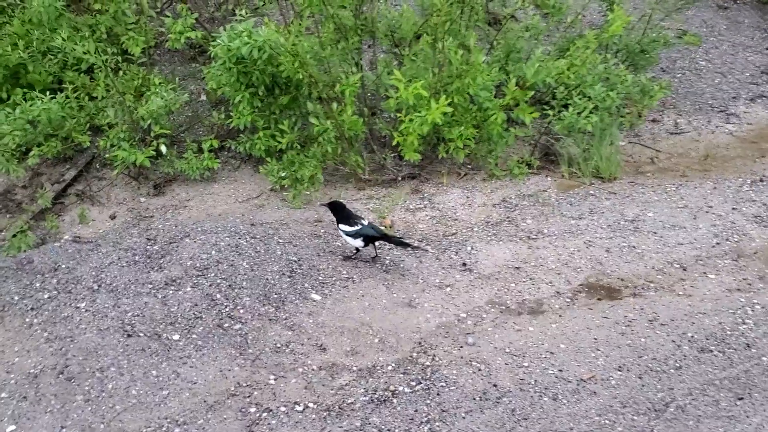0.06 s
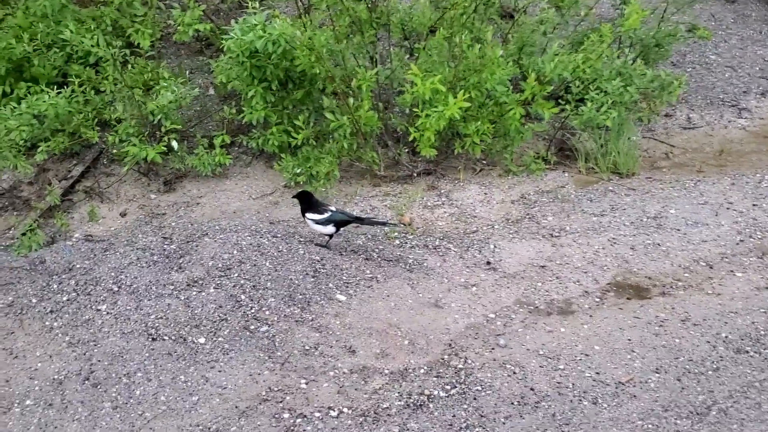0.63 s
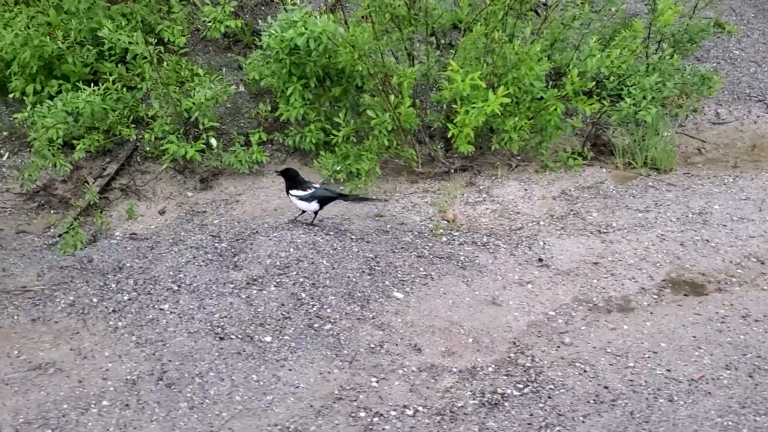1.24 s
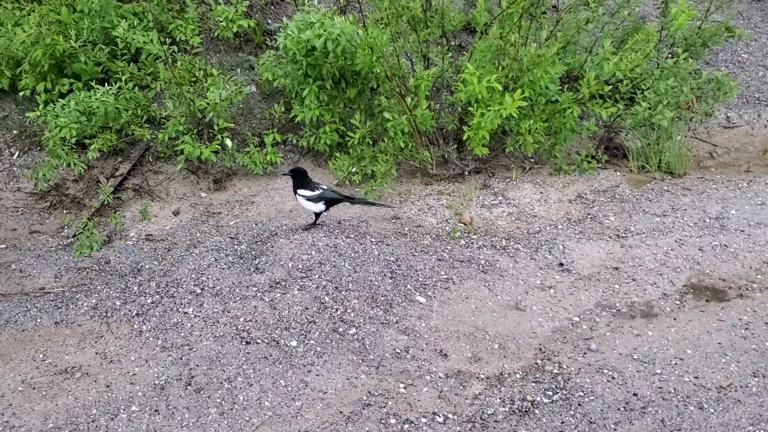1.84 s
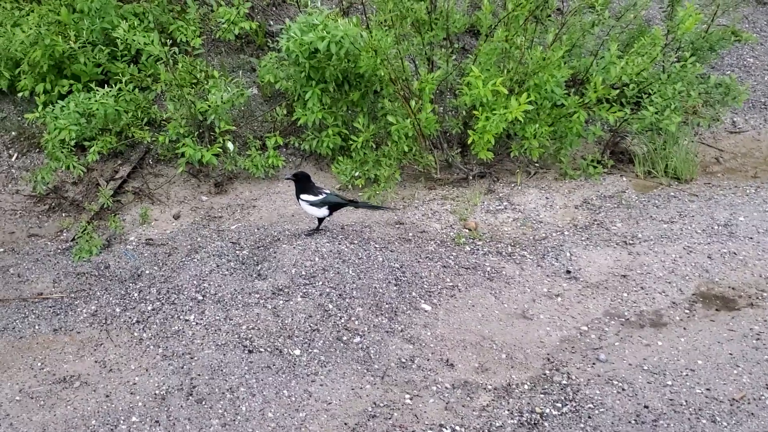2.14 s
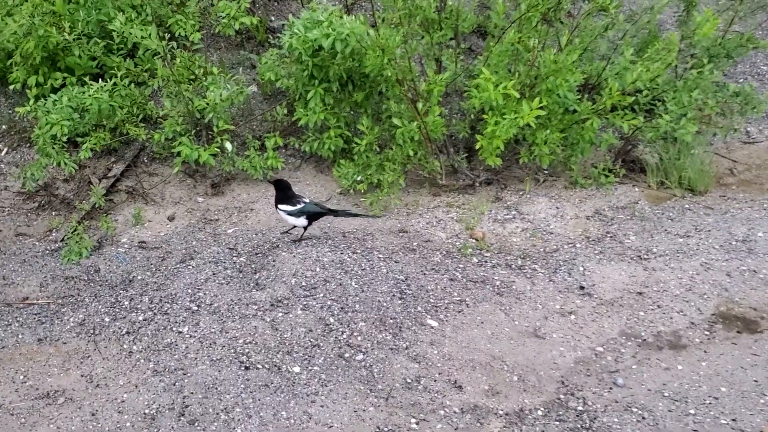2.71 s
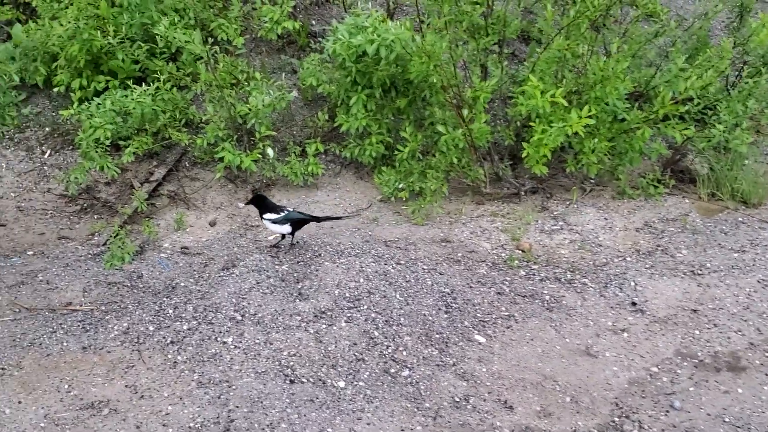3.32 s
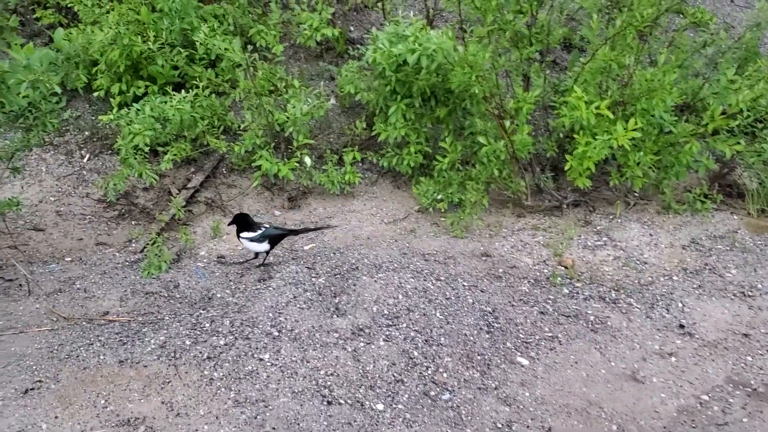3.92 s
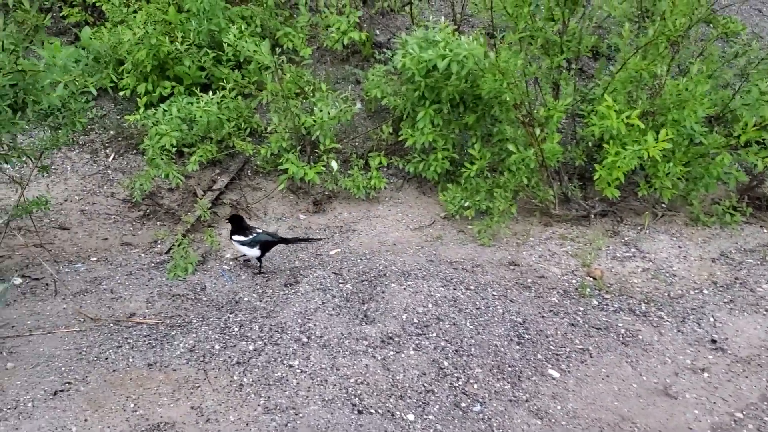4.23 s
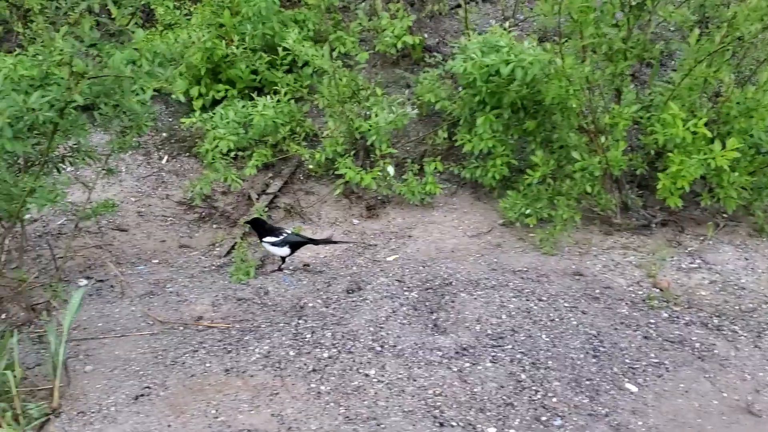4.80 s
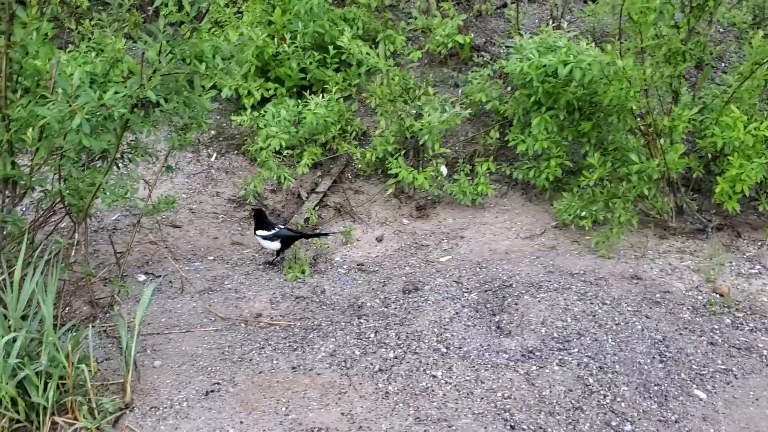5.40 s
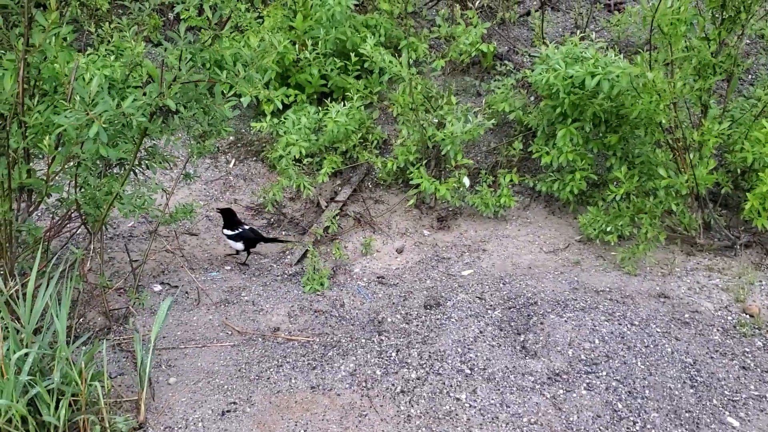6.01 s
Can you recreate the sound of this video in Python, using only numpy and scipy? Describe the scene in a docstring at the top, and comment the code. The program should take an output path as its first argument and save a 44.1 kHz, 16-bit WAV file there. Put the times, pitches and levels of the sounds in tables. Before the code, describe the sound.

A magpie calls outdoors over a faint, steady low rumble, a deep distant drone and soft leafy hiss. After a light scuff, it gives a loud, raspy squawk at about 0.4 seconds, under a fifth of a second long, climbing quickly in pitch and dropping at the very end. Three softer mews, each arching up and down, follow at 1.2, 1.6 and 2.0 seconds, with a soft puff of rumble on the microphone near 1.3. Loud rising squawks return at 2.4 and 3.6 seconds, then a quiet mew at 4.3, another squawk at 5.2 and a slightly weaker one at 6.0. The calls scatter briefly off the bank and bushes. Grit and twigs tick lightly, most clearly near 0.7, 3.4 and between 3.9 and 4.5 seconds. Three very faint, thin, high whistled notes come from far right between 2.6 and 4.2 seconds.

```python
"""A magpie on gravel in front of a bushy bank gives nine short rising calls: five squawks, four mews.
Its voice is a rough harmonic stack gliding through throat resonances; bank and leaves scatter it briefly.
Soft high hiss swells as a reverberant haze around the calls and as leaf rustle elsewhere.
Grit and twigs tick, and a thin whistle and a deep drone come from far off.
Two microphone ports pick it all up outdoors, over a low rumble that puffs up once at the microphone."""
import sys
import numpy as np
from scipy import signal
from scipy.fft import rfft, irfft, next_fast_len
from scipy.io import wavfile
from scipy.ndimage import uniform_filter1d

SR = 44100
rng = np.random.default_rng(int(sys.argv[2]) if len(sys.argv) > 2 else 0)


def to_wav(s):
    """Save 16-bit WAV."""
    ch = np.atleast_2d(s).T  # columns
    pcm = np.round(np.clip(ch, -1, 1) * 32767)  # PCM
    wavfile.write(sys.argv[1], SR, pcm.astype(np.int16))


N = 271215
T = np.arange(N) / SR

# spectrum of the open air: frequency_hz, relative_density_db
AIR_SPECTRUM = [(32, -31), (55, -3.5), (117, -5.5), (183, -10.5), (232, -8.5), (274, -13.5), (518, -18),
                (1050, -25), (2130, -27), (3590, -26.5), (4040, -28), (5890, -42), (10600, -49),
                (13500, -46), (15500, -68)]
# lean of the air between the ports: frequency_hz, left_minus_right_db
AIR_BALANCE = [(60, -1.5), (110, 1), (200, -0.5), (380, 1.0), (700, 0.5), (1290, 2), (2380, -2.5),
               (4400, -3.0), (8120, 15.5), (15000, -1)]
# stereo width of the air: frequency_hz, side_minus_mid_db
AIR_WIDTH = [(60, -13), (110, -18), (200, -13), (380, -7.5), (700, -1), (1290, 3.5), (2380, 0), (4400, 0),
             (8120, 1), (15000, -0.5)]
# swells of high hiss (haze around the calls, leaf rustle elsewhere): centre_s, half_length_s, rise_db
HISS_SWELLS = [(0.03, 0.24, 8), (1.178, 0.24, 5), (2.006, 0.28, 9), (2.596, 0.068, 10.5), (4.012, 0.65, 7),
               (5.248, 0.31, 5.5), (6.14, 0.32, 7)]
# soft scuffs and rustles: centre_s, half_length_s, level_db, centre_hz, width_hz
SCUFFS = [(0.143, 0.12, -50.5, 4200, 350), (0.148, 0.16, -63, 10000, 12000),
          (0.642, 0.039, -59, 13000, 5070), (3.872, 0.12, -66.5, 11000, 9000),
          (4.18, 0.06, -69, 7000, 9000), (4.574, 0.15, -66.5, 12100, 8000)]
# grit and twigs: start_s, peak_db, centre_hz, width_hz, decay_s
TICKS = [(.236, -33.5, 1000, 1000, 0.0017), (.65, -26.5, 382, 320, .002),
         (0.652, -32.5, 2820, 4650, 0.0011), (1.36, -35, 3500, 6000, 0.00079),
         (1.612, -48, 9000, 4000, .001), (2.408, -46, 8000, 7000, .001), (3.076, -42, 6800, 7000, 0.00066),
         (3.391, -26, 3210, 1300, 0.0024), (3.393, -33, 1310, 1200, 0.0018),
         (3.941, -31.5, 1350, 1000, 0.0022), (4.129, -27.5, 1200, 1700, 0.0017),
         (4.158, -47, 13000, 5000, .001), (4.244, -47, 9000, 7000, .002), (4.49, -31, 1310, 1600, 0.0014)]
# the bird's throat and open beak: frequency_hz, gain_db
THROAT = [(500, -35), (1100, -25), (1650, -5), (1950, 0), (2380, 9), (2850, -0.5), (3350, -7.5),
          (4250, -3.5), (5200, -21), (7000, -22.5), (7900, -32.5), (9400, -24.5), (12800, -25),
          (15500, -25.5)]
# loud calls: start_s, rise_s, first_hz, climb_hz_per_s, level_db, attack_s, push_db_per_s, release_s,
# bright_db, rasp_db, tilt_db_per_octave, fourth_harmonic_db, gape (factor on the resonances)
SQUAWKS = [(.367, 0.15, 320, 2953, -15.5, 0.056, 76, 0.043, -8, -13.5, -8, 9.5, 1.065),
           (2.414, 0.15, 320.9, 3032, -16.5, 0.041, 87, 0.052, -9.5, -13, -6.5, 8, 1.07),
           (3.562, .149, 340, 2953, -17, 0.095, 33, 0.04, -10.5, -10, -6, 8, 1.007),
           (5.171, 0.14, 392.5, 2568, -15, .036, 20, 0.037, -15, -16, 0, 10, 1.025),
           (6.043, .15, 333.2, 3090, -20.5, .036, 50, 0.041, -12.5, -6.5, 1, 4.5, 1.053)]
# the ports, from the bird's direction: frequency_hz, left_db, right_db, left_lead_rad
PORT_RESPONSE = [(700, 13.5, 8, 0.27), (1830, -3.5, 3.5, 0.53), (2260, -4, 6.5, 1.46), (3500, -13, 0, 2.4),
                 (4200, -8.5, 2.5, 4.8), (4820, -5.5, -5, 8.2), (5770, -0.5, -12.5, 1.3),
                 (8260, -6, -17, 10.7), (9000, -3, -2, 12.8), (12800, -11, -6, 18.4), (14700, -16, -35, 9)]
# soft calls: start_s, rise_s, fall_s, first_hz, top_hz, last_hz, pointedness, level_db, attack_s,
# release_s, bright_db, jitter (share of pitch), rasp_db, odd_harmonics_db, tilt_db_per_octave, flip_hz
MEWS = [(1.203, .123, 0.025, 420, 983, 640, 8.2, -28.5, 0.075, 0.046, -12.5, 0.029, -4.5, -9, -16.5, 840),
        (1.647, 0.11, 0.037, 492, 1076, 735, 3.35, -33, 0.068, 0.047, -9, 0.021, -11.5, -3, -18.5, 427),
        (1.972, .098, .137, 738, 1161, 763, 2.1, -39, .03, 0.12, -7, 0.049, -7, -6, -19, 880),
        (4.32, .094, 0.031, 529, 1030, 650, 7, -32, 0.084, 0.033, -9.5, 0.026, -7.5, -5, -4, 820)]
# notes of the far whistle: start_s, length_s, pitch_hz, level_db
WHISTLE_NOTES = [(2.58, .32, 3840, -62), (2.92, .44, 3970, -65), (3.9, .3, 3400, -63)]

TOP_HZ = 15800


def undb(db):
    """Decibels to gain."""
    return 10 ** (np.asarray(db) / 20)


def unit(x):
    """Scale to rms 1."""
    return x / np.sqrt(np.mean(x ** 2) + 1e-20)


def at_hz(table, hz, column=1):
    """Read a column of a spectrum table on a log-frequency axis."""
    table = np.array(table, float)
    return np.interp(np.log(np.maximum(hz, 1)), np.log(table[:, 0]), table[:, column])


def shape(x, gain):
    """Filter by a gain that is a function of frequency."""
    size = next_fast_len(x.shape[-1] + 2048)
    return irfft(rfft(x, size) * gain(np.fft.rfftfreq(size, 1 / SR)), size)[..., :x.shape[-1]]


def wander(size, hz):
    """Smooth random motion up to a given rate, rms 1."""
    return unit(shape(rng.standard_normal(size), lambda f: 1 / (1 + (f / hz) ** 4)))


def resonate(x, hz, width_hz):
    """One two-pole resonance."""
    return signal.lfilter(*signal.iirpeak(min(hz, .45 * SR), hz / width_hz, fs=SR), x)


def pan(ratio):
    """Left and right gains of a given ratio and unit mean power."""
    return np.array([ratio, np.ones_like(ratio)]) / np.sqrt((1 + ratio ** 2) / 2)


def add(out, start_s, sound):
    """Mix a sound in at its time."""
    part = out[int(start_s * SR):][:len(sound)]
    part += sound[:len(part)]


def air(bed_db=-45, lull_db=-6):
    """Distant rumble, alike at both ports, under a soft high hiss that swells at set times."""
    noise = rng.standard_normal((2, N))
    mid, side = shape(noise, lambda f: undb(at_hz(AIR_SPECTRUM, f)) / (1 + (f / TOP_HZ) ** 40))
    side = shape(side, lambda f: undb(at_hz(AIR_WIDTH, f)))
    bed = np.array([mid + side, mid - side]) / np.std(mid) * undb(bed_db)
    bed = shape(bed, lambda f: pan(undb(at_hz(AIR_BALANCE, f))))
    hiss = shape(bed, lambda f: 1 - 1 / (1 + (f / 1300) ** 2))
    rumble = (bed - hiss) * undb(.5 + wander(N, hz=10.6))
    swell_db = sum(db * np.exp(-((T - centre_s) / half_s) ** 2) for centre_s, half_s, db in HISS_SWELLS)
    return rumble + hiss * undb(lull_db + swell_db + .5 * wander(N, hz=38))


def drone(hz=52, width_hz=12, level_db=-51):
    """A faint, deep drone from far away: a narrow band of noise."""
    band = resonate(rng.standard_normal(N), hz, width_hz)
    return undb(level_db) * unit(resonate(band, hz, 4 * width_hz))


def scuffs():
    """Soft scuffs: dense grains of uneven size that swell and fade."""
    out = np.zeros((2, N))
    for centre_s, half_s, level_db, hz, width_hz in SCUFFS:
        span = np.abs(T - centre_s) < 2 * half_s
        grains = rng.standard_normal((2, span.sum())) * undb(3.5 * wander(span.sum(), hz=300))
        swell = np.exp(-((T[span] - centre_s) / half_s) ** 2)
        out[:, span] += undb(level_db) * unit(resonate(grains, hz, width_hz)) * swell
    return out


def ticks():
    """Grit and twigs: each tick is a tiny burst of contacts ringing one broad resonance."""
    out, t = np.zeros((2, N)), T[:2000]
    for start_s, peak_db, hz, width_hz, decay_s in TICKS:
        noise = rng.standard_normal((3, len(t)))
        ring = (noise[0] + .5 * noise[1:]) * np.exp(-t / decay_s)  # mostly shared by both ports
        for _ in range(3):  # steep flanks
            ring = resonate(ring, hz, 1.37 * width_hz)
        start = int(start_s * SR)
        out[:, start:start + len(t)] += undb(peak_db) * ring / np.abs(ring).max()
    return out


def breath(t, attack_s, push_db_per_s, release_s, onset_db=20.5, release_db=19.5):
    """The bird's effort in dB: it swells in, keeps pushing and is cut off."""
    starting = np.clip(1 - t / attack_s, 0, 1)
    closing = np.clip((t - t[-1]) / release_s + 1, 0, 1)
    push_db = push_db_per_s * np.minimum(t - t[-1] + release_s, 0)
    return push_db - onset_db * starting ** 1.47 - release_db * closing ** 1.7


def call(t, glide_hz, effort_db, bright_db, rasp_db, tilt_db_per_octave,
         jitter, odd_db, flip_hz, fourth_db, flipped_fourth_db=0, gape=1):
    """The syrinx beats strong-weak, so even harmonics lead; it runs cleaner as the pitch rises."""
    pitch = uniform_filter1d(np.maximum(glide_hz, 200), size=130)
    pitch = pitch * (1 + .011 * wander(len(t), hz=70.3))  # an unsteady voice
    slack = 600 / np.minimum(pitch, 800)
    phase = 2 * np.pi * np.cumsum(pitch * (1 + jitter * slack * wander(len(t), hz=313))) / SR
    k = np.arange(1, 41)[:, None]
    harmonic_hz = k * pitch
    # the beak is still opening on the low notes, which lowers the resonances
    opening = gape * np.minimum(pitch / 520, 1) ** .32
    # past flip_hz the voice flips to a thinner, cleaner register and stays on the second harmonic
    flip = np.maximum.accumulate(np.clip((pitch - flip_hz) / 110, 0, 1))
    source_db = odd_db * (k % 2) * np.where(k > 3, 2, 1) + 10 * flip * (k == 2)
    source_db += (fourth_db * (1 - flip) + flipped_fourth_db * flip) * (k == 4)
    slope_db = tilt_db_per_octave * np.log2(np.clip(harmonic_hz, 1300, 3200) / 2000)
    gains = undb(at_hz(THROAT, harmonic_hz / opening) + source_db + slope_db) * (harmonic_hz < TOP_HZ)
    stack_rms = np.sqrt((gains ** 2).sum(0) / 2)
    # the throat spreads each pulse in time; upper harmonics flutter out of step into a hoarse band
    flutter = np.minimum((k / 7) ** 3, 1.6) * wander((len(k), len(t)), hz=150)
    tone = (gains * np.sin(k * phase + k ** 2 + flutter)).sum(0) / stack_rms
    tone *= 1 + .17 * slack * wander(len(t), hz=160)
    # air hisses through the membranes in uneven puffs and rings the same throat
    puffs = rng.standard_normal(len(t)) * (1 + .6 * np.cos(phase)) * undb(2 * wander(len(t), hz=200))
    rasp = shape(puffs, lambda f: undb(at_hz(THROAT, f) + .5 * np.log2(np.maximum(f, 1000) / 2400)))
    voice = tone + undb(rasp_db - 1.5 * flip) * slack ** 1.4 * unit(rasp)
    upper = shape(voice, lambda f: 1 - 1 / (1 + (f / 3600) ** 16))
    upper_rms = np.sqrt(uniform_filter1d(upper ** 2, size=1300) + 1e-9)
    # the call swells as a strong harmonic crosses the main resonance
    body = (voice - upper) * (stack_rms / stack_rms.max()) ** .88 * undb(effort_db)
    treble = upper / upper_rms * undb(bright_db + 1.33 * effort_db)  # grows faster than the breath
    fade = np.clip(np.minimum((t - t[0]) / .014, (t[-1] - t) / .003), 0, 1)
    return (body + treble) * fade


def squawks(flick_hz=90, flick_s=.012, drop_hz=485, drop_s=.026):
    """The magpie's loud, raspy calls: the pitch climbs steadily, flicks up and drops."""
    out = np.zeros(N)
    for (start_s, rise_s, first_hz, climb_hz_per_s, level_db, attack_s, push_db_per_s, release_s,
         bright_db, rasp_db, tilt_db_per_octave, fourth_db, gape) in SQUAWKS:
        t = T[T < rise_s + drop_s]
        rising_s = np.minimum(t, rise_s)
        flick = flick_hz * np.exp((rising_s - rise_s) / flick_s)
        drop = drop_hz * ((t - rising_s) / drop_s) ** 1.5
        glide_hz = first_hz + climb_hz_per_s * rising_s + flick - drop
        effort_db = breath(t, attack_s, push_db_per_s, release_s)
        squawk = call(t, glide_hz, effort_db, bright_db, rasp_db, tilt_db_per_octave,
                      jitter=.0192, odd_db=-1.5, flip_hz=734, fourth_db=fourth_db, gape=gape)
        add(out, start_s, undb(level_db) * squawk)
    return out


def scatter(x):
    """Quick echoes from ground and bank, then a faint tail from the bushes, different at each port."""
    t = T[:SR * 3 // 4]

    def echoes(db, decay_s):
        tail = rng.standard_normal((2, len(t))) * np.exp(-t / decay_s) * (t > .002)
        return undb(db) * tail / np.sqrt((tail ** 2).sum(1, keepdims=True))

    # stones throw back short waves best
    bank = shape(echoes(db=-13.5, decay_s=.009), lambda f: np.sqrt(1 + (f / 5000) ** 2))
    leaves = echoes(db=-21.5, decay_s=.065)
    return x + signal.fftconvolve(x[None], bank + leaves, axes=1)[:, :N]


def microphone_ports(x):
    """Each port has its own colour, and the sound reaches the left one a little sooner."""
    def response(hz):
        left_db, right_db, lead_rad = (at_hz(PORT_RESPONSE, hz, column) for column in (1, 2, 3))
        return np.array([undb(left_db) * np.exp(1j * lead_rad), undb(right_db)])

    return shape(x, response)


def mews(push_db_per_s=20):
    """The same bird's soft calls: the pitch arches over a round top; a pointed arch has hollow flanks."""
    out = np.zeros(N)
    for (start_s, rise_s, fall_s, first_hz, top_hz, last_hz, pointedness, level_db, attack_s,
         release_s, bright_db, jitter, rasp_db, odd_db, tilt_db_per_octave, flip_hz) in MEWS:
        t = T[T < rise_s + fall_s]
        flank_s = np.where(t < rise_s, rise_s, fall_s)
        foot_hz = np.where(t < rise_s, first_hz, last_hz)
        arch = 1 - ((t - rise_s) / flank_s) ** 2
        arch /= 1 + pointedness * ((t - rise_s) / max(rise_s, fall_s)) ** 2
        glide_hz = foot_hz + (top_hz - foot_hz) * arch
        effort_db = breath(t, attack_s, push_db_per_s, release_s)
        mew = call(t, glide_hz, effort_db, bright_db, rasp_db, tilt_db_per_octave,
                   jitter, odd_db, flip_hz, fourth_db=2, flipped_fourth_db=9.5)
        add(out, start_s, undb(level_db) * mew)
    return out


def buffet(centre_s=1.284, half_s=.063, hz=66, level_db=-37):
    """A short, soft puff of rumble right at the microphone."""
    band = resonate(rng.standard_normal(N), hz, width_hz=43)
    rumble = unit(resonate(band, hz, width_hz=42))
    return rumble * undb(level_db) * np.exp(-np.abs((T - centre_s) / half_s) ** 3)


def whistle(sag_hz_per_s=144, fade_s=.056):
    """Thin notes, far off to the right, that sag a little and waver in level."""
    out = np.zeros(N)
    for start_s, length_s, hz, level_db in WHISTLE_NOTES:
        t = T[T < length_s]
        pitch = (hz - sag_hz_per_s * t) * (1 + .0048 * wander(len(t), hz=59.6))
        tone = np.sin(2 * np.pi * np.cumsum(pitch) / SR)
        fade = np.minimum(np.minimum(t, length_s - t) / fade_s, 1)
        add(out, start_s, tone * fade * undb(level_db + 2 * wander(len(t), hz=20)))
    return out * undb([[-3], [3]])


def scene():
    """The magpie before the bank and the sounds around it, heard from the microphone."""
    magpie = microphone_ports(scatter(squawks() + mews()))
    return magpie + ticks() + scuffs() + whistle() + air() + drone() + buffet()


def record(dry):
    """The recorder cuts the top with a steep low-pass."""
    return signal.sosfilt(signal.ellip(10, .2, 80, TOP_HZ, fs=SR, output="sos"), dry)


dry = scene()
out = record(dry)
to_wav(out)
```